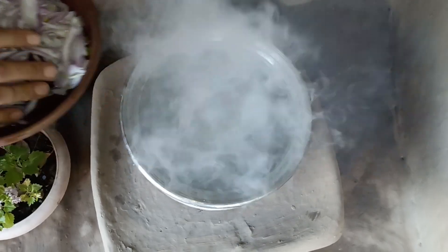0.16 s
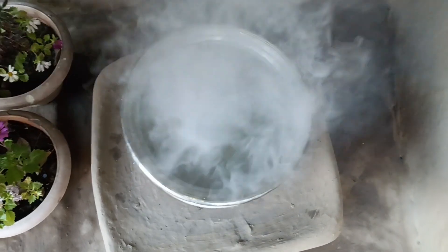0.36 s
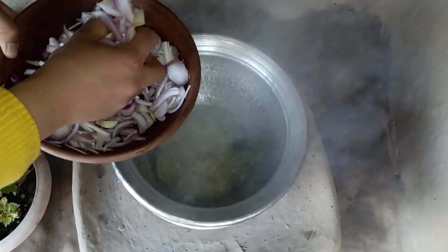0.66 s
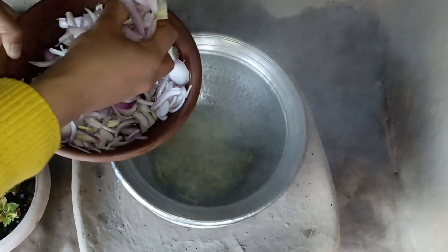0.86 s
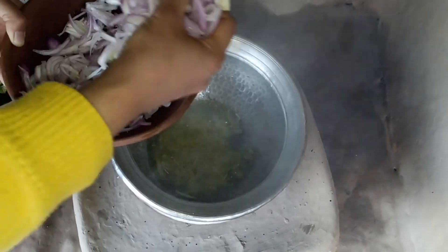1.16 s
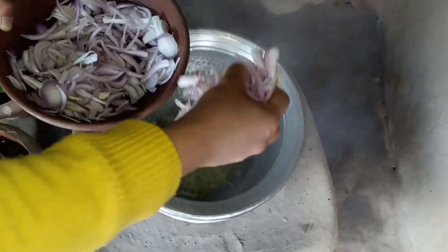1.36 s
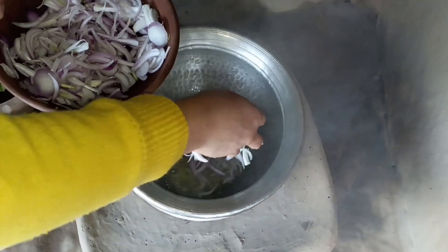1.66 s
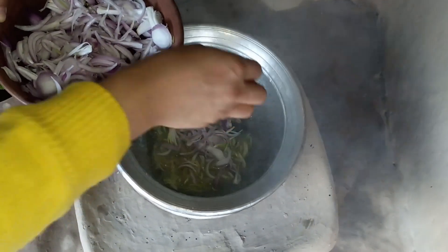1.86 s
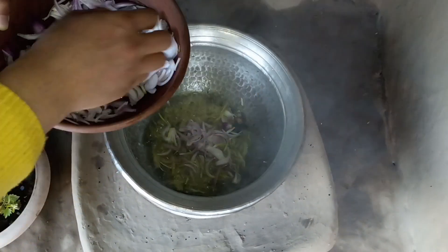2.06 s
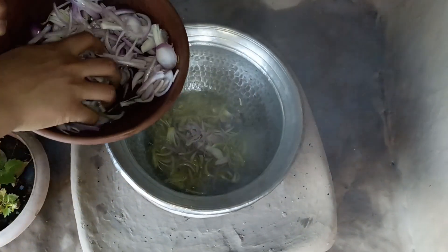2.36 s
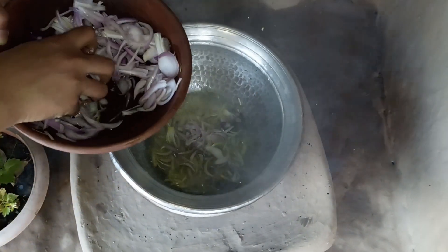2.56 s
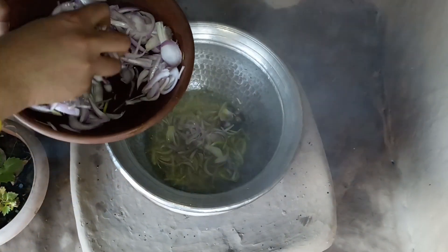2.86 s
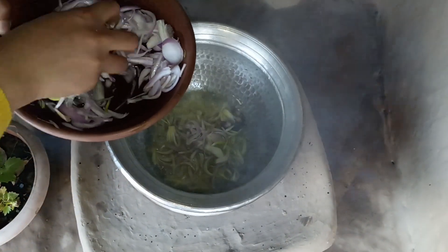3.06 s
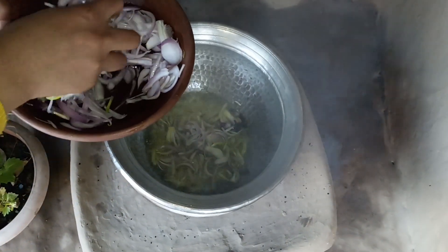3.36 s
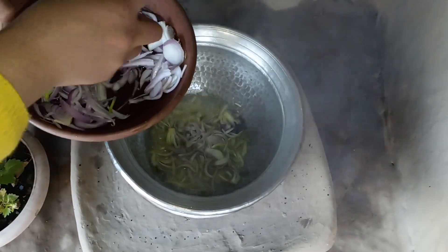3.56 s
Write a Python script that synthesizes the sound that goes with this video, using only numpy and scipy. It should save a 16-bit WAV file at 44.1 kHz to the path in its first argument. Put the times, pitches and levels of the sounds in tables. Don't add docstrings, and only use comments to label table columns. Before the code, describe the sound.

Onions fry fiercely in a round metal pot, drop abruptly to scattered spits over a far engine's drone, then flare as another handful lands and fade; close, outdoors, almost all on the right.

```python
import sys
import numpy as np
from scipy import signal
from scipy.fft import rfft, irfft, next_fast_len
from scipy.io import wavfile
from scipy.ndimage import uniform_filter1d

SR = 44100
rng = np.random.default_rng(int(sys.argv[2]) if len(sys.argv) > 2 else 0)


def store_wav(level_fs):
    pcm = np.round(np.clip(np.atleast_2d(level_fs), -1, 1) * 32767)
    wavfile.write(sys.argv[1], SR, pcm.T.astype(np.int16))


def voltage_ratio(decibels):
    exponent = np.asarray(decibels, float) / 20
    return 10 ** exponent


N = 163170


def unit(x):
    return x / np.sqrt(np.mean(x ** 2))


def colour(x, points, bumps=()):
    n = next_fast_len(len(x) + 8192)
    f = np.maximum(np.arange(8193) * SR / 16384, 1)
    p = np.array(points, float)
    db = np.interp(np.log(f), np.log(p[:, 0]), p[:, 1])
    db = db + sum(g / (1 + (2 * (f - hz) / w) ** 2) for hz, w, g in bumps)
    cepstrum = irfft(db * np.log(10) / 20)
    cepstrum[1:8192] *= 2
    cepstrum[8193:] = 0
    response = irfft(np.exp(rfft(cepstrum)))[:8192]
    return unit(irfft(rfft(x, n) * rfft(response, n), n)[:len(x)])


def curve(table, axis):
    points = np.array(table, float)
    return np.interp(np.arange(N) / SR, points[:, 0], points[:, axis])


def walk(rate):
    k = int(SR / rate)
    x = uniform_filter1d(uniform_filter1d(rng.standard_normal(N), k), k)
    return unit(x - uniform_filter1d(x, 5 * k))


def hiss():
    # f/Hz, level/dB
    hiss_colour = [(25, -18), (60, -2), (90, 5.5), (400, -1), (800, -7.5), (3500, -16), (7000, -26.5),
                   (16000, -27)]
    return voltage_ratio(-63) * colour(rng.standard_normal(N), hiss_colour)


def engine():
    # t/s, level/dB, partials above the fifth/dB
    engine_swell = [
        (0, -64, -23),
        (.45, -44.5, -10.5),
        (1.8, -44, -5.5),
        (2.25, -42, -7.5),
        (2.45, -43, 3.5),
        (3.15, -42, 5.5),
        (3.45, -48.5, 1),
        (3.7, -51.5, 9),
    ]
    # multiple of the turn, level/dB
    partials = [(2, -21), (3, -3), (4, -1), (5, -9.5), (6, -3), (7, -3.5), (8, 1.5), (9, -10)]
    # f/Hz, level/dB
    rumble_colour = [(25, -39), (60, -29), (80, -2), (200, 0.5), (400, -14.5), (700, -24), (1100, -38)]
    turn_hz, rough_db, rumble_db = 25.96, 3, -48
    turn = 2 * np.pi * np.cumsum(turn_hz * (1 + 0.0064 * walk(1.44))) / SR
    drone = 0
    for k, db in partials:
        k = round(k)
        level_db = db + rough_db * walk(7.2) + (k > 5) * curve(engine_swell, axis=2)
        drone = drone + np.sin(k * turn + 6 * rng.random()) * voltage_ratio(level_db)
    rumble = voltage_ratio(rumble_db) * colour(rng.standard_normal(N), rumble_colour)
    return drone * voltage_ratio(curve(engine_swell, axis=1)) + rumble


def echo(x):
    t60_s, echo_db, ripple = 0.05, -2, .12
    t = np.arange(N) / SR
    tail = rng.standard_normal(N) * voltage_ratio(np.maximum(-60 * t / t60_s, -200)) * (t > .0015)
    h = 1 + voltage_ratio(echo_db) * rfft(tail / np.sqrt(np.sum(tail ** 2)))
    return irfft(rfft(x) * h / np.abs(h) ** (1 - ripple), N)


def pot(x, points):
    # f/Hz, width/Hz, full steam/dB, lull/dB, after the handful/dB
    pot_notes = [(308, 16, 2, -3, 1), (424, 50, 8.5, 6.5, 8), (554, 36, 12.5, 7, 8), (801, 30, -11, -3, -9),
                 (854, 25, 7.5, 7.5, 3), (1071, 36, -13, -10, -6), (1169, 73, -1.5, 7.5, 10),
                 (1253, 41, 6, 10, 0.5), (1537, 57, -0.5, -2.5, -8.5), (1618, 98, -6, -7.5, -6.5),
                 (2236, 28, 1, 6.5, 3.5), (2870, 260, 1.5, 2, 2), (3400, 230, 3.5, 4, 2.5),
                 (4210, 340, 1, 3, 1)]
    # f/Hz, width/Hz, full steam/dB, lull/dB, after the handful/dB
    more_pot_notes = [(1446, 28, -9, 4, -3), (1794, 52, -7, -6, -8), (1915, 49, 5, 11, 5.5),
                      (2400, 97, 0.5, -0.5, -1.5), (2584, 40, 3, 7.5, 3), (2710, 26, 2, 5.5, 5),
                      (2737, 34, -10, 2.5, -7), (2806, 33, 0, 6, 6.5), (3025, 70, 3, 7, -0.5),
                      (3214, 44, -3, 5.5, 3.5), (3528, 43, -10, 9.5, 1), (3770, 70, -1, 3.5, -6),
                      (3920, 24, -4, 7, 4), (676, 100, 0.5, 1.5, -1)]
    lull_s, drop_s = .487, 1.68
    notes, t = np.array(pot_notes + more_pot_notes), np.arange(N) / SR
    stage = (t > lull_s) * 1 + (t > drop_s)
    return np.choose(stage, [colour(x, points, notes[:, [0, 1, k]]) for k in (2, 3, 4)])


def clicks(rate, spread_db, top_db=11):
    when, side, size = rng.random((int(rate * N / SR), 3)).T
    out = np.zeros(N)
    level_db = np.minimum(-spread_db * np.log(size + 1e-9), top_db)
    out[(when * N).astype(int)] = np.sign(side - .5) * voltage_ratio(level_db)
    return unit(out)


def bubbles(centre_hz, spread, cycles, rate, count):
    out, t = np.zeros(N), np.arange(SR // 20) / SR
    for k in np.linspace(-1, 1, count):
        hz = centre_hz * np.exp(spread * k)
        rising = np.sin(2 * np.pi * hz * t * (1 + 0.061 * hz * t / cycles))
        ring = rising * np.exp(-np.pi * hz * t / cycles)
        out += unit(signal.fftconvolve(clicks(rate, spread_db=1.5), ring)[:N])
    return pot(echo(out), [(20, -45), (250, 0), (SR / 2, 0)])


def patchy(x, db, rate):
    patch_edges = [1500, 2600, 4600, 9000, 12500]
    band, spec = np.digitize(np.fft.rfftfreq(N, 1 / SR), patch_edges), rfft(x)
    return sum(irfft(spec * (band == k), N) * voltage_ratio(db * walk(rate)) for k in range(len(patch_edges) + 1))


def spits():
    # t/s, peak/dB, sputter tail/dB, f/Hz
    spit_list = [(.014, -16.5, -7, 900), (.037, -9, -4, 3000), (.065, -5, -12, 6900), (.189, -15, -3, 2950),
                 (.241, -5, -10, 6860), (.534, -27, -14, 6950), (.605, -22, -8, 7000),
                 (.671, -18, -5, 7000), (.967, -33, -15, 3000), (1.021, -14, -10, 4000),
                 (1.102, -18, -3, 2920), (1.154, -26, -1, 3000), (1.618, -24, -6, 3200),
                 (1.989, -7, -8, 6500), (1.997, -18, 0, 1150), (2.045, -12, 0.5, 5000),
                 (2.093, -10.5, -0.5, 2950), (2.112, -16.5, 0, 1200), (2.355, -9.5, -2, 3040),
                 (2.529, -9.5, -9, 2720), (2.691, -14, -8, 5460), (2.827, -13, -2, 2500),
                 (2.13, -13, -2, 2950), (1.900, -3, -12, 4500), (3.046, -19.5, 3, 2400),
                 (3.13, -19, -12, 7040), (3.264, -15, -4, 3000), (3.432, -12.5, -6, 2930),
                 (.710, -13, -7, 3200), (1.055, -19, -14, 14500), (1.189, -18, -16, 14000),
                 (1.23, -18, -14, 14500), (1.263, -21, -12, 4500), (.867, -20, -14, 6500),
                 (1.339, -17.5, -2, 2980), (1.393, -14, -19, 3200), (1.457, -18, -7, 4500),
                 (1.545, -25.5, 4.5, 3400), (1.678, -26, 2, 2500), (1.870, -7, -18, 5500),
                 (1.893, -12, -3, 4500), (1.951, -5, -3.5, 2900), (2.174, -9, -14, 14000),
                 (2.943, -12, -8, 3980), (2.970, -16, 4, 2500), (2.970, -21.5, -8, 614),
                 (2.987, -13, 1, 2400), (3.628, -13.5, -2, 4140), (3.692, -18.5, 5, 2870)]
    tail_s, gain_db, width = .008, 3, .8
    out, t = np.zeros(N + SR), np.arange(SR // 10) / SR
    for s, db, tail_db, hz in spit_list:
        edges_hz = [hz * (1 - width / 2), min(hz * (1 + width / 2), .45 * SR)]
        band = signal.butter(2, edges_hz, "band", fs=SR)
        crack = signal.lfilter(*band, t == 0)
        sputter = unit(signal.lfilter(*band, rng.standard_normal(len(t))))
        tail = sputter * voltage_ratio(tail_db) * np.exp(-t / tail_s) / 2
        start = int(s * SR)
        out[start:start + len(t)] += voltage_ratio(db + gain_db) * (crack / np.abs(crack).max() + tail)
    return pot(out[:N], [(20, 0), (SR / 2, 0)]) * np.std(out[:N])


def fry():
    # t/s, level/dB, finest spray/dB, boil of large bubbles/dB
    heat = [(0, -23, -9, -14), (.25, -22.5, -8, -13.5), (.48, -25, -6, -11.5), (.494, -33.5, -11, -17),
            (.75, -33.5, -12, -14.5), (1.22, -34.5, -8.5, -14), (1.3, -34.5, -15, -12.5),
            (1.66, -37, -15, -13), (1.7, -34, -5.5, -5.5), (1.795, -29.5, -3, -15),
            (1.825, -25.5, -8, -18.5), (1.92, -25.5, -8.5, -18), (2.13, -25, -9.5, -17),
            (2.3, -27.5, -6.5, -13), (2.62, -27.5, -8, -14), (2.8, -30.5, -9, -13),
            (3.02, -29.5, -10.5, -14), (3.7, -32.5, -11, -12)]
    # f/Hz, level/dB
    burst_colour = [(250, -23.5), (700, -15.5), (1400, -7), (2100, -5.5), (3000, -3), (4800, -7),
                    (6400, -4), (9500, -19)]
    # f/Hz, level/dB
    spray_colour = [(5000, -36.5), (8000, 1.5), (11000, -2), (13000, -4), (15500, 5.5), (20000, 3)]
    surge_db = .6 * walk(13)
    steam = rng.standard_normal((2, N))
    burst = pot(echo(clicks(2000, spread_db=0) + voltage_ratio(-2) * steam[0]), burst_colour)
    droplets = clicks(2500, spread_db=10.5, top_db=15)
    spray = colour(echo(droplets + voltage_ratio(-4) * steam[1]), spray_colour)
    boil = bubbles(centre_hz=441.6, spread=0.35, cycles=7.7, rate=260, count=5)
    fizz = bubbles(centre_hz=2500, spread=.5, cycles=55, rate=45, count=13)
    mix = patchy(burst, 0.86, 36)
    mix = mix + patchy(spray, 1.3, 32) * voltage_ratio(2.5 + curve(heat, axis=2))
    mix = mix + boil * voltage_ratio(-1 + curve(heat, axis=3))
    mix = mix + fizz * voltage_ratio(-6.5)
    return mix * voltage_ratio(curve(heat, axis=1) + surge_db + 6.5) + spits()


def leak(near, far):
    bass = signal.lfilter(*signal.butter(1, 44.7, fs=SR), (near + far) * voltage_ratio(-19.5))
    scatter = rng.standard_normal(9000) * np.exp(-np.arange(9000) / 2500.)
    scatter = scatter / np.sqrt(np.sum(scatter ** 2))
    dull = signal.lfilter(*signal.butter(2, 2500, fs=SR), signal.fftconvolve(near, scatter)[:N])
    return bass + voltage_ratio(-54.5) * dull


def scene():
    far, near = engine(), fry()
    return np.array([leak(near, far) + hiss(), near + far])


def roll_off(x):
    return signal.sosfilt(signal.butter(12, 17060, fs=SR, output="sos"), x)


def record(dry):
    # f/Hz, level added above it/dB
    eq_steps = [
        (3600, -0.5),
        (6860, -1.5),
        (11600, 5),
    ]
    limit, top_hz = .8, 15720
    f = np.fft.rfftfreq(N, 1 / SR)
    db = sum(g / (1 + np.exp(np.clip((hz - f) / 15, -50, 50))) for hz, g in eq_steps)
    db = db - 60 / (1 + np.exp(np.clip((top_hz + 40 - f) / 12, -50, 50)))
    overloaded = limit * np.tanh(dry / limit)
    mix = irfft(rfft(overloaded) * voltage_ratio(db), N)
    return roll_off(mix)


dry = scene()
out = record(dry)
store_wav(out)
```